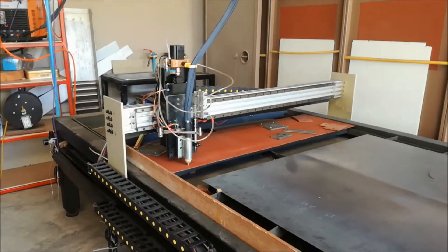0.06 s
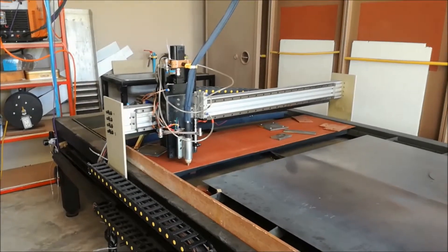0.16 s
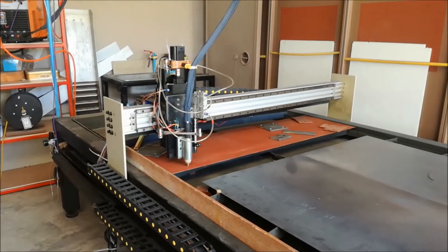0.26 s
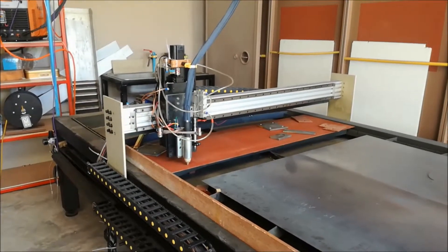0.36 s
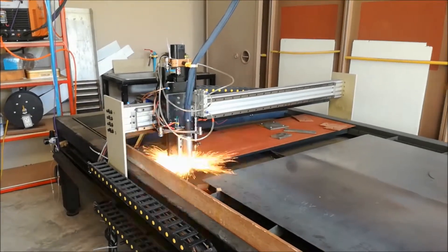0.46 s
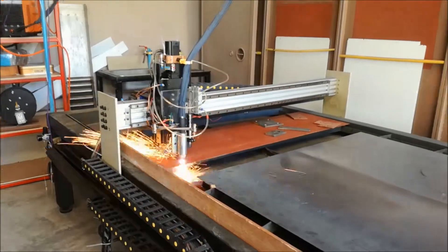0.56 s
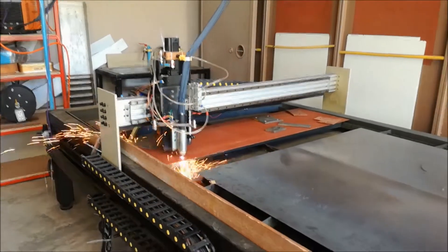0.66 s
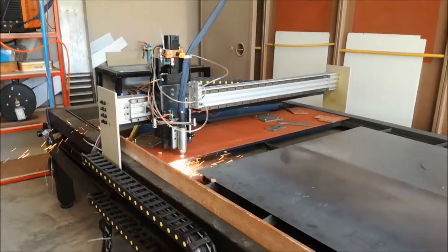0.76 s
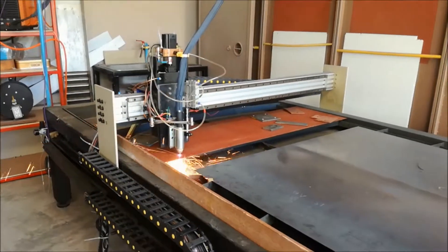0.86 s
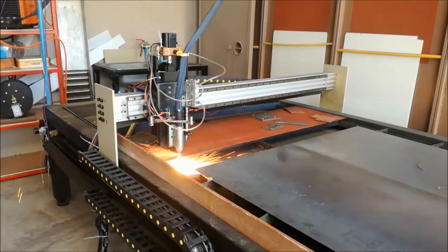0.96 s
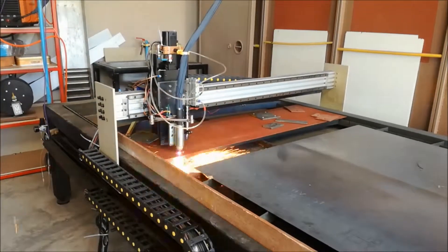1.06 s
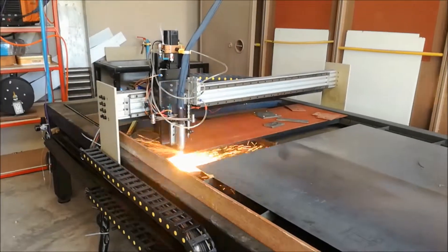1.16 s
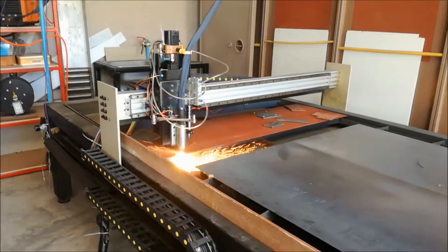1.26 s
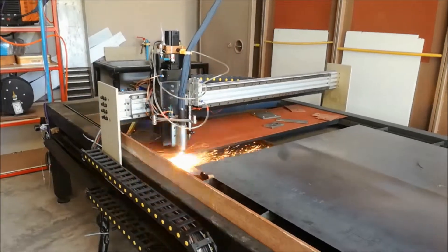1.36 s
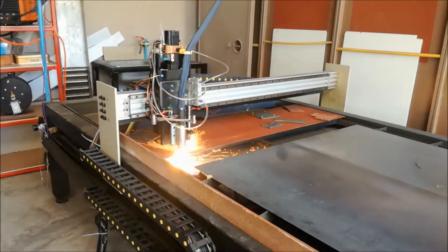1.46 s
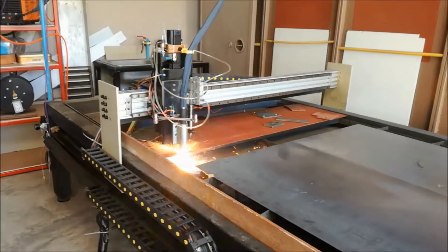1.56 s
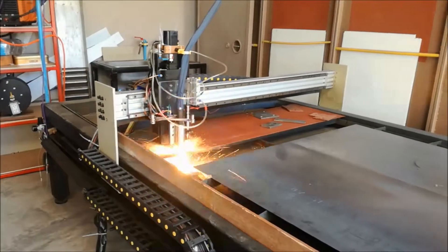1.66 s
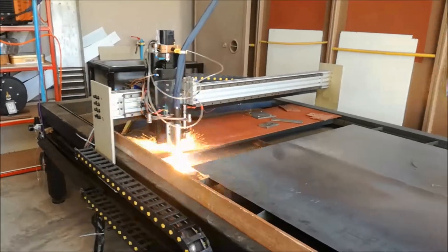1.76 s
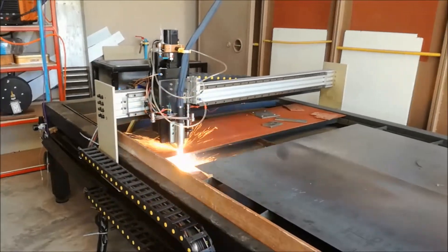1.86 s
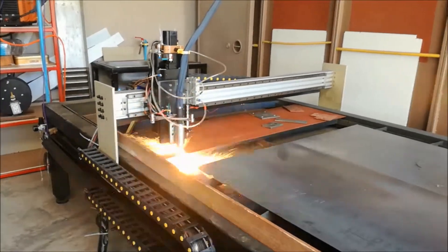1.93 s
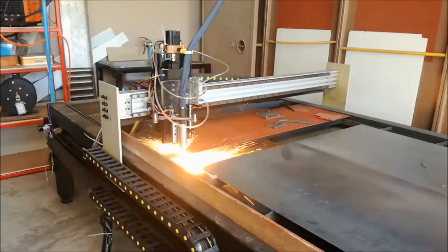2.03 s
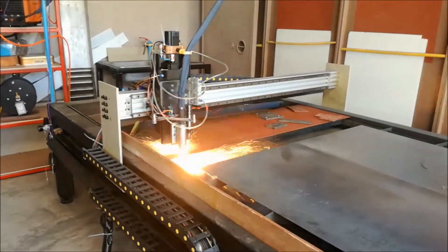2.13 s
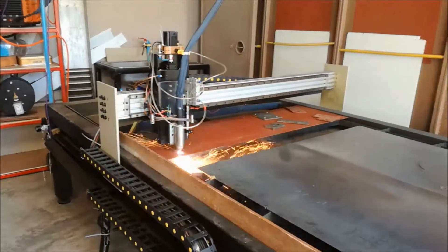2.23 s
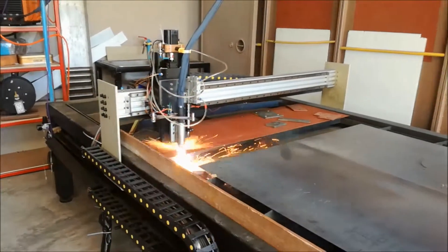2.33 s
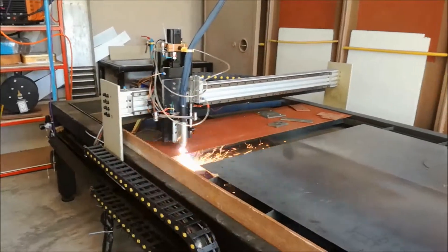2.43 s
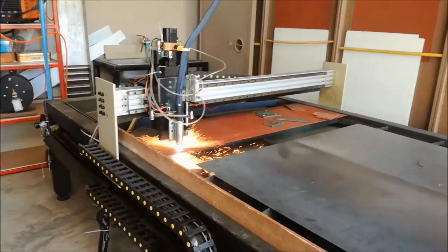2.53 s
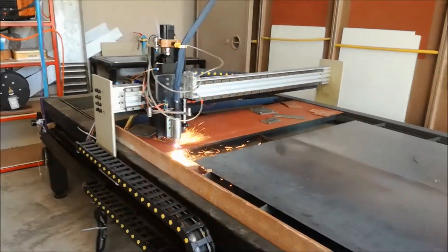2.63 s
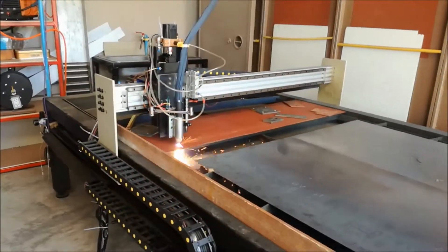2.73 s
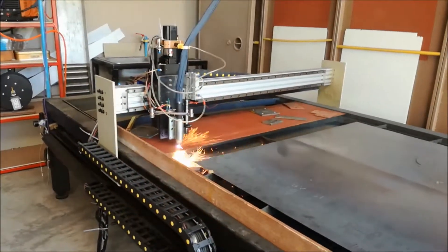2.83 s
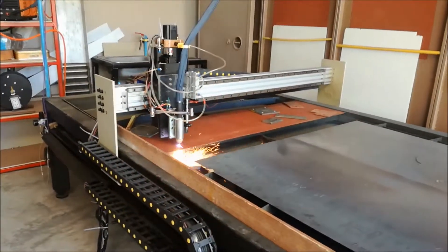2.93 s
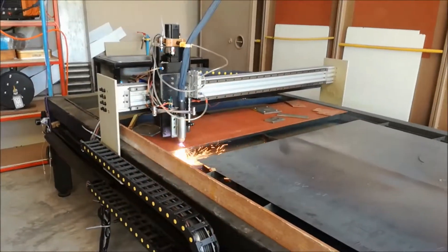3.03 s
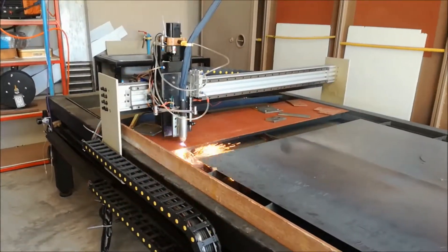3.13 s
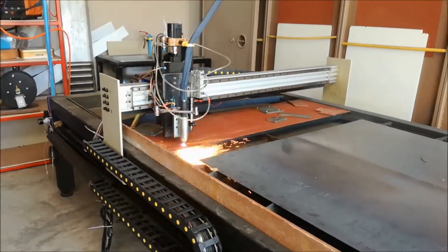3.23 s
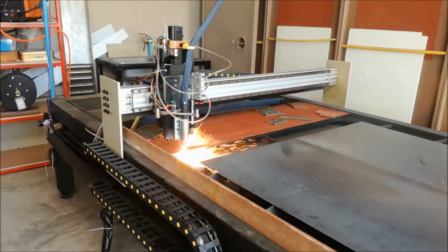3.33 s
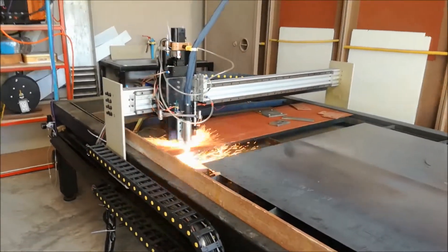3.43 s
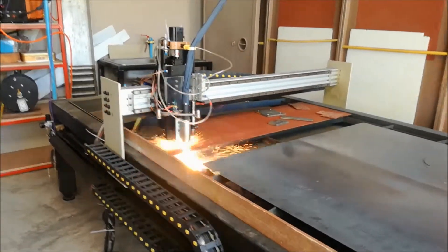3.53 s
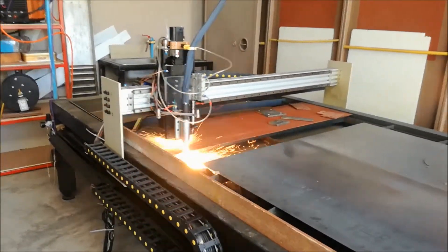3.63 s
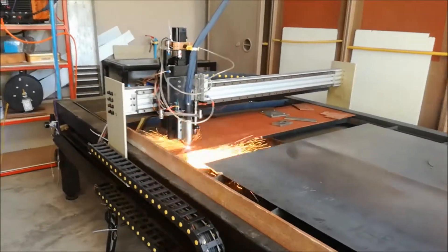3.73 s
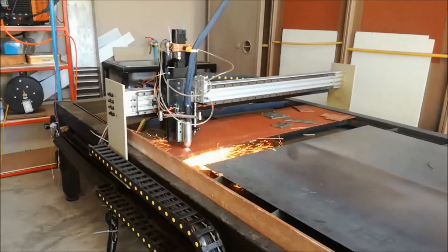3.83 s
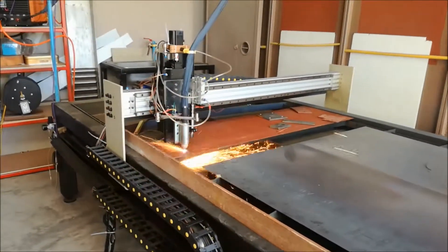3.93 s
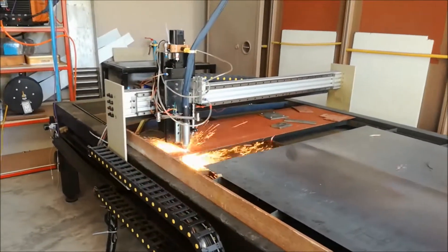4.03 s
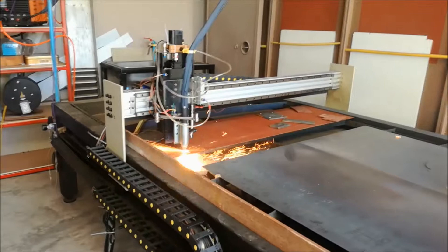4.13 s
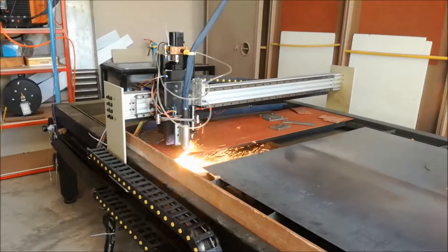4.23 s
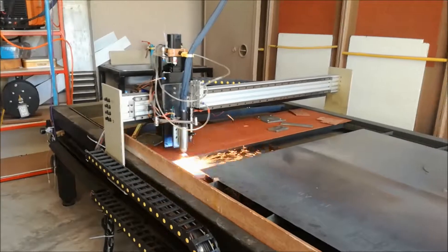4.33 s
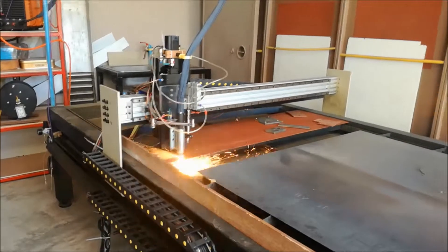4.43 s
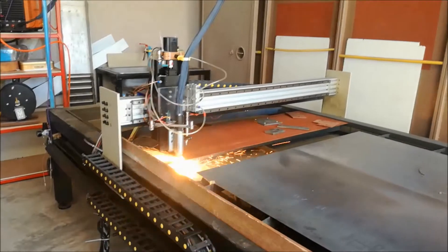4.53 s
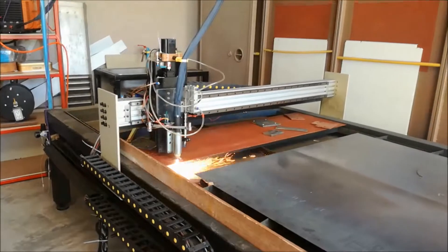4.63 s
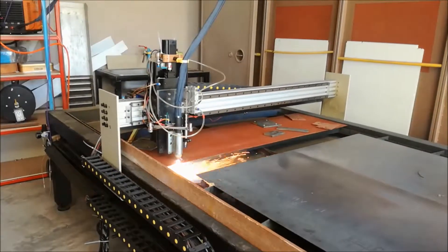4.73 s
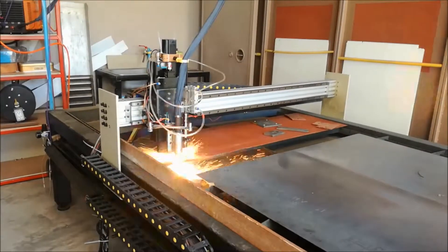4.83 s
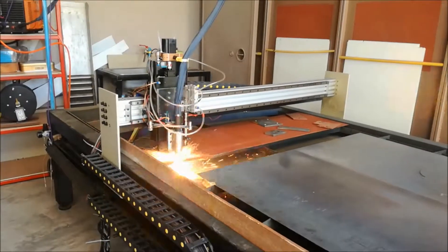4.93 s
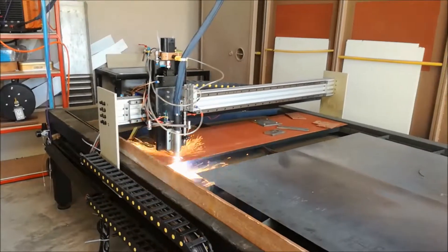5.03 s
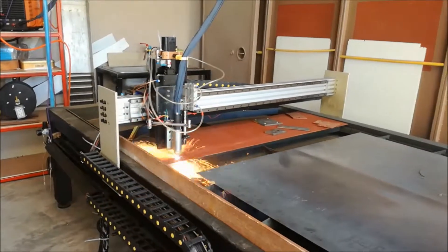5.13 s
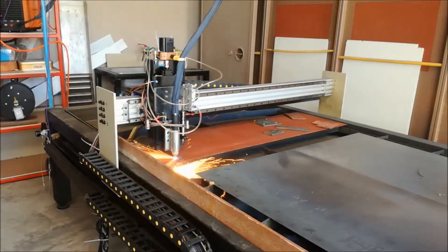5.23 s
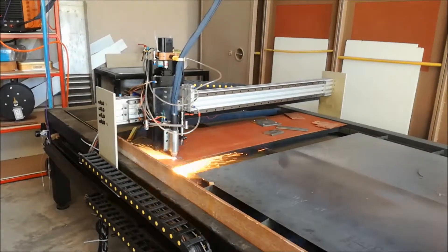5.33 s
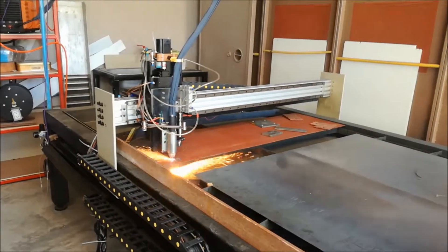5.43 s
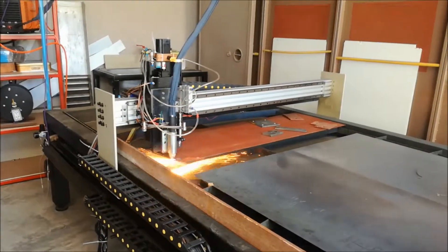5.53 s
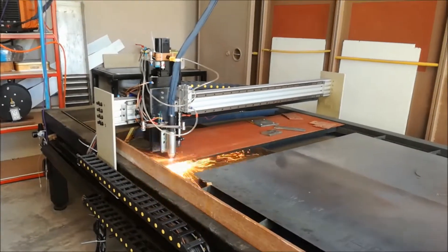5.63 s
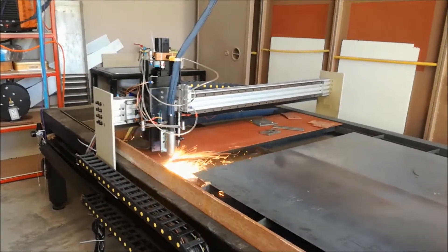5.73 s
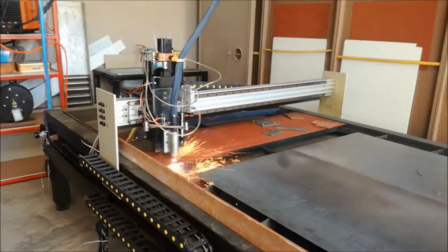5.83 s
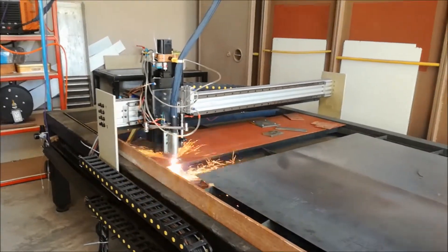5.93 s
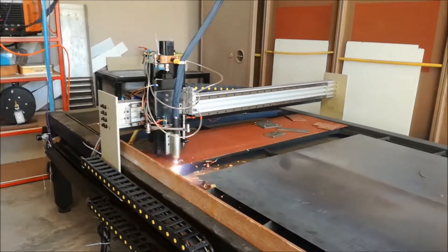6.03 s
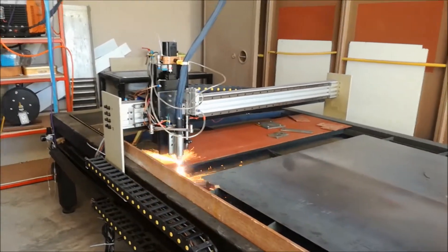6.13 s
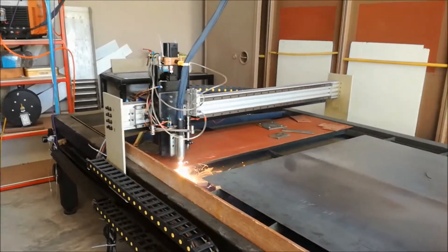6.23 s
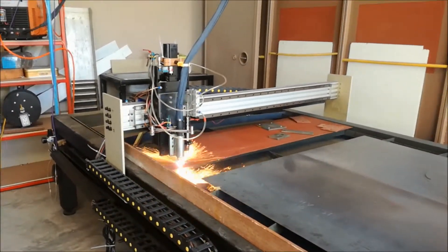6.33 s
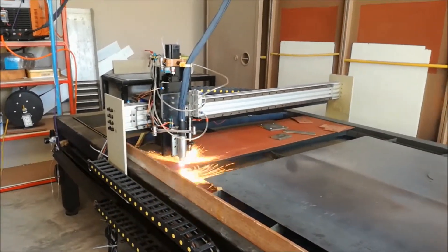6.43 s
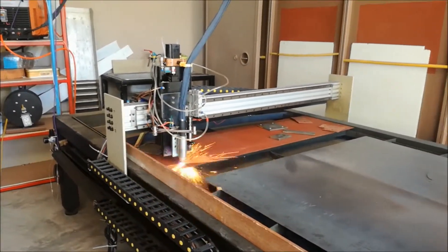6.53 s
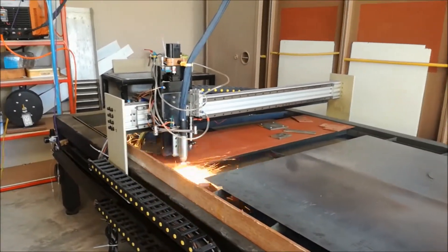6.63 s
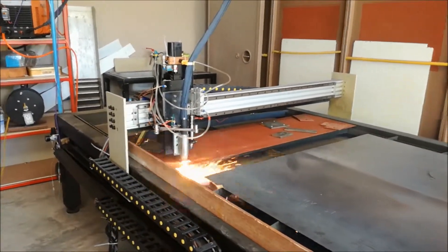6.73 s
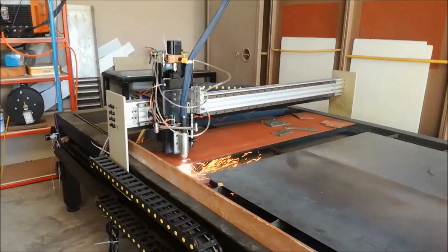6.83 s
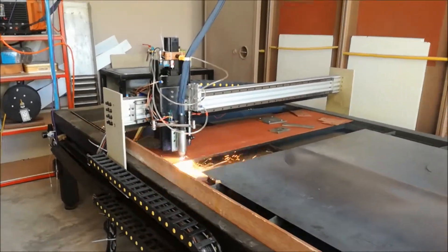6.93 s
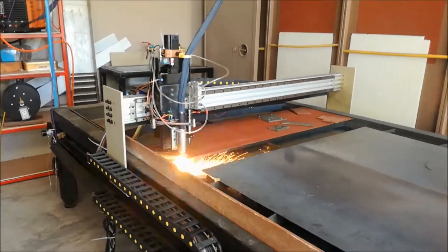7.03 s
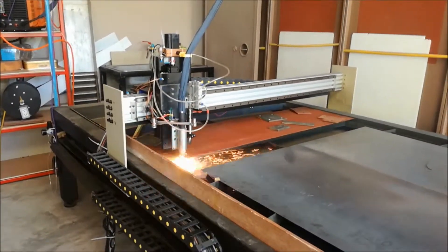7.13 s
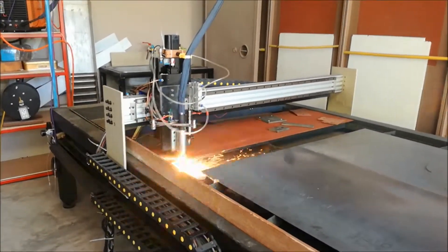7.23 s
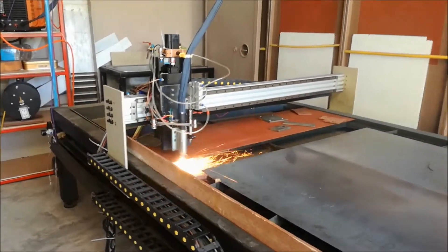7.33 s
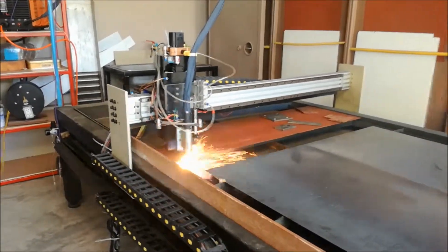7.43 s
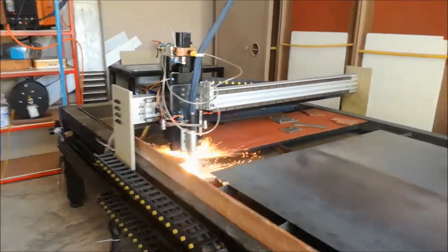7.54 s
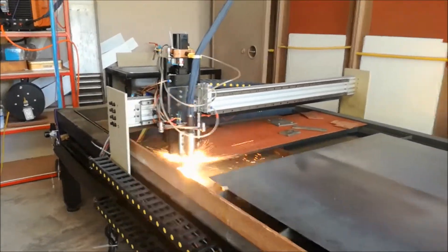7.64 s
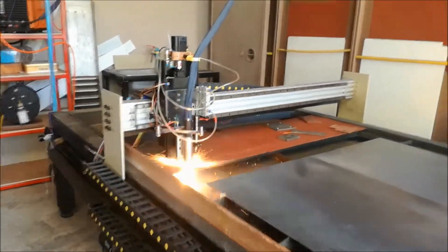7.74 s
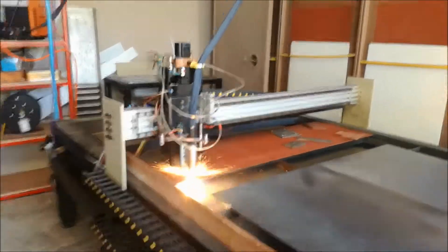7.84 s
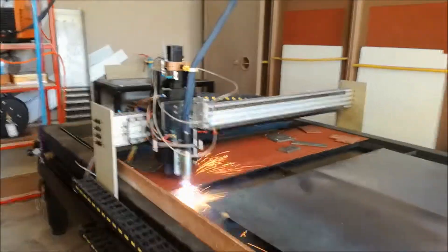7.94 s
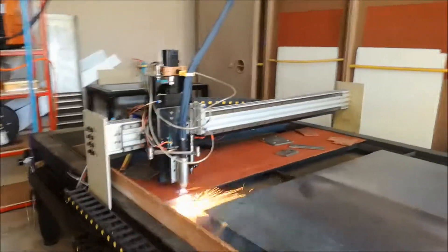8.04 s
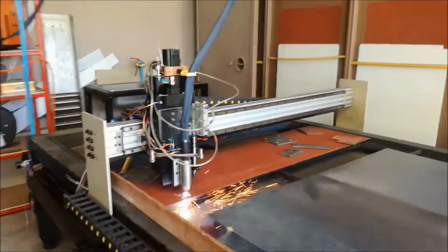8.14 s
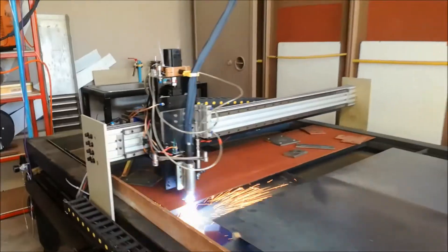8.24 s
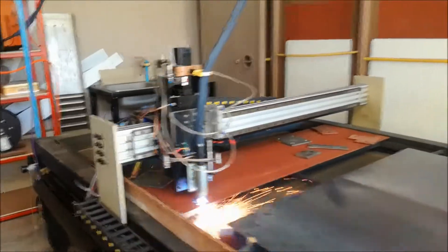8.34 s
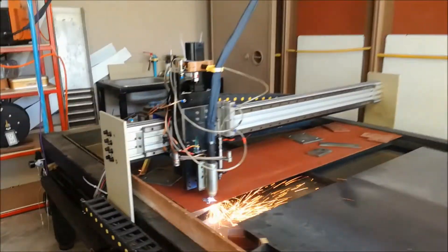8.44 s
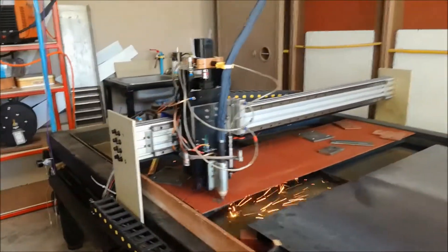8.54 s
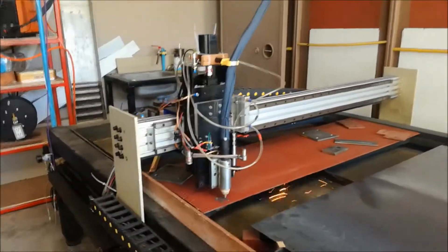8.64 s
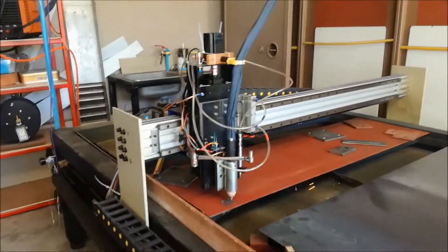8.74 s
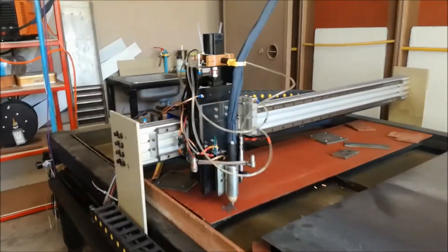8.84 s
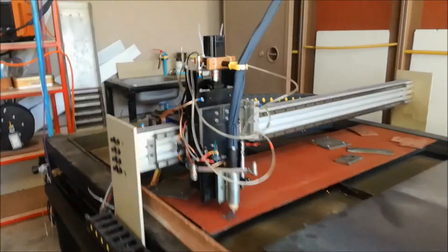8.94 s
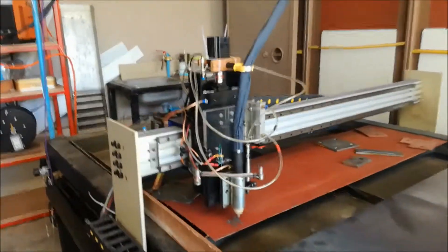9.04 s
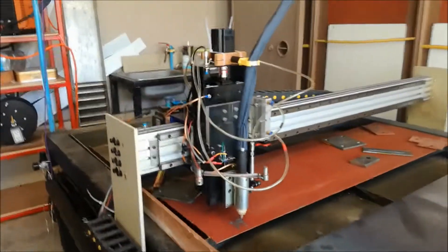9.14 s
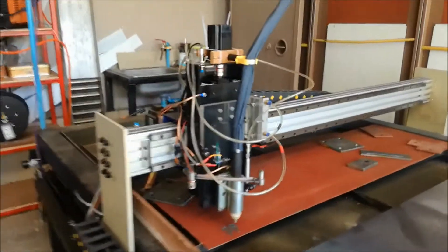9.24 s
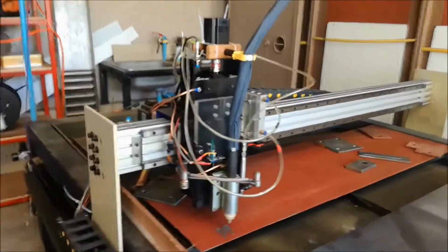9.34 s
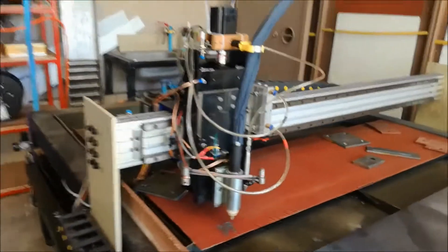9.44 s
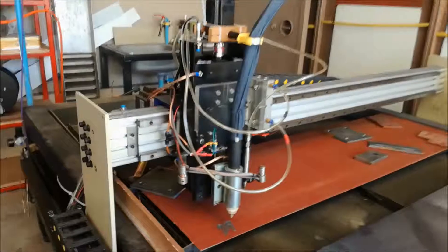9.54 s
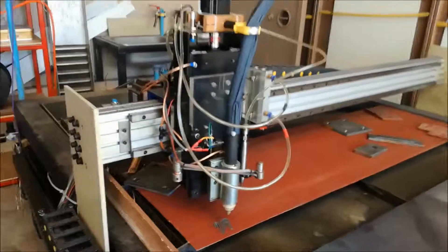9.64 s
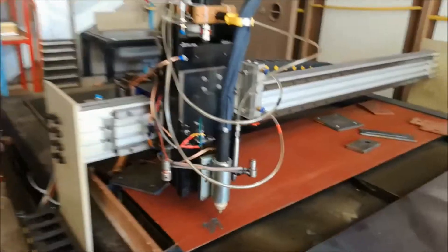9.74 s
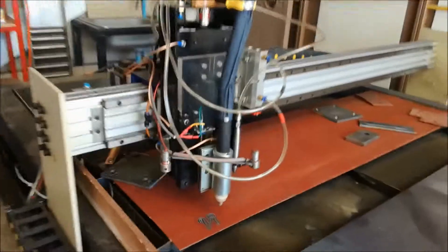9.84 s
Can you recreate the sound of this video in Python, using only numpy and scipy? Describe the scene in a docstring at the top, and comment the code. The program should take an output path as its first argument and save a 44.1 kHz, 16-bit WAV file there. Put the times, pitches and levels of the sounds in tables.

```python
"""A workshop with a plasma torch on a cutting table: the air valve opens, the arc strikes and cuts steel plate,
then goes out while the air keeps flowing.
The jet hisses and crackles with sparks, roars in the kerf and churns in the tray below: patchy, coloured noise.
Now and then a brief note, a wavering sine, whistles through. A motor hums as the torch comes down.
The hand-held camera rumbles, bursts of low noise, as it is carried closer."""
import sys
import numpy as np
from scipy import signal
from scipy.fft import rfft, irfft, next_fast_len
from scipy.io import wavfile
from scipy.ndimage import uniform_filter1d, map_coordinates

SR = 44100
rng = np.random.default_rng(int(sys.argv[2]) if len(sys.argv) > 2 else 0)


def pcm_store(signal):
    """Save signal as 16-bit PCM."""
    levels = np.round(np.clip(np.atleast_2d(signal), -1, 1) * 32767)
    wavfile.write(sys.argv[1], SR, levels.astype(np.int16).T)


N = 435708
T = np.arange(N) / SR
STRIKE_S, BREAK_S = 0.393, 8.414  # the arc lights; it runs off the plate's edge


def amp(db):
    """Decibels to gain."""
    return 10 ** (np.asarray(db) / 20)


def unit(x):
    """x at rms 1."""
    return x / np.sqrt(np.mean(x ** 2) + 1e-20)


def along(points, hz):
    """(f/Hz, value) points read on a log frequency axis."""
    f, value = np.transpose(points)
    return np.interp(np.log(hz + 1), np.log(f + 1), value)


def curves(rows):
    """One value per sample for each column after the time."""
    s, *columns = np.transpose(rows)
    return [np.interp(T, s, column) for column in columns]


def gate(start, end, rise, fall):
    """1 between start and end, with straight flanks inside them."""
    return np.clip((T - start) / rise, 0, 1) * np.clip((end - T) / fall, 0, 1)


def bell(s, length):
    """A smooth swell of height 1 at time s, down to 1/e at length seconds either side."""
    return np.exp(-((T - s) / length) ** 2)


def wobble(rate):
    """A smooth random curve, rate knots a second."""
    coarse = T[::32]
    knots = rng.standard_normal(int(N * rate / SR) + 4)
    return np.interp(T, coarse, map_coordinates(knots, [coarse * rate], order=2))


def noise_pair():
    """Two unrelated white noises."""
    return rng.standard_normal((2, N))


def filtered(x, response):
    """x times a response of frequency."""
    m = next_fast_len(N + 8192)
    gain = response(np.fft.rfftfreq(m, 1 / SR).astype(np.float32))
    spectrum = rfft(x.astype(np.float32), m) * gain.astype(np.complex64)
    return irfft(spectrum, m)[..., :N]


def colour(points):
    """The response of a (f/Hz, level/dB) spectrum."""
    return lambda hz: amp(along(points, hz))


def resonances(modes):
    """The response of (f/Hz, width/Hz, level/dB) resonances, summed with alternating signs."""
    def response(f):
        return sum((-1) ** k * amp(db) * 1j * f * width / (centre * centre - f * f + 1j * f * width)
                   for k, (centre, width, db) in enumerate(modes))
    return response


def stereo(pair, response):
    """A pair of signals, coloured as middle and side, becomes left and right whose middle has rms 1."""
    # how alike left and right are if the pair is unrelated: f/Hz, correlation
    likeness = [(60, 0.71), (120, 0.9), (240, 0.93), (480, -0.073), (950, 0.52), (1890, 0.057),
                (3770, 0.099), (7520, 0.06), (15000, -0.092)]

    def spread(hz):
        alike = np.clip(along(likeness, hz), -1, 1)
        return response(hz) * np.sqrt([1 + alike, 1 - alike])
    mid, side = filtered(pair, spread)
    return np.array([mid + side, mid - side]) / np.std(mid)


def patches(bins, frames):
    """Turns random values into patches, bins high and frames long."""
    return lambda grid: unit(uniform_filter1d(uniform_filter1d(grid, size=bins, axis=0), size=frames, axis=1))


def turbulence(patchy_db):
    """Two noises with patches of random gain: narrow ones, and broad ones that shift the timbre."""
    z = signal.stft(noise_pair(), nperseg=512)[2]
    narrow = patches(3, 14)(rng.standard_normal(z.shape[1:]))
    broad = patches(14, 30)(rng.standard_normal(z.shape[1:]))
    patchy = z * amp(patchy_db * (narrow + 0.6 * broad))
    return unit(signal.istft(patchy, nperseg=512)[1][:, :N])


def pops(rate, spread_db):
    """Random impulses of uneven size, rate a second, at rms 1."""
    size = amp(spread_db * np.minimum(rng.exponential(size=N), 3))
    return unit((rng.random(N) < rate / SR) * size * rng.choice([-1, 1], N))


def spits(rate, decay):
    """Surges that start quickly and die away with time constant decay, around zero at rms 1."""
    starts = (rng.random(N) < rate / SR) * (1 + rng.random(N))
    decaying = signal.lfilter([1], [1, -np.exp(-1 / (decay * SR))], starts)
    surge = uniform_filter1d(decaying, size=60)
    return unit(surge - surge.mean())


def workshop(x, wet_db):
    """Plate and walls comb each signal of a pair differently; the comb drifts as torch and camera move."""
    # reverberation of plate and walls: f/Hz, time to fall 60 dB/s
    walls = [(200, 0.21), (2000, 0.15), (8000, 0.069), (16000, 0.21)]
    hop = SR * 2 // 3
    echo = np.zeros((2, N + 3 * SR))
    padded = np.pad(x, ((0, 0), (hop, 2 * hop)))
    fade = np.sin(np.pi * np.arange(2 * hop) / (2 * hop))
    for start in range(0, N + hop, hop):  # each overlapping stretch gets a fresh tail
        hz, t, z = signal.stft(rng.standard_normal((2, SR // 6)), SR, nperseg=256)
        decay = amp(-60 * t / along(walls, hz)[:, None])
        tail = signal.istft(z * decay, SR, nperseg=256)[1]
        tail = tail / np.linalg.norm(tail[0])
        part = signal.fftconvolve(padded[:, start:start + 2 * hop] * fade, tail, axes=1)
        echo[:, start:start + part.shape[1]] += part
    return unit(x + amp(wet_db) * echo[:, hop:hop + N])


def lift_motor():
    """The lift motor hums waveringly, with a rough resonant whine, until the cut is under way."""
    # moves of the motor, each a swell of hum: t/s, level/dB, half-length/s
    lifts = [(0.08, -46, .02), (.24, -52, 0.061), (0.362, -41.5, 0.028), (.48, -48, .06)]
    # resonances of its rough whine: f/Hz, width/Hz, level/dB
    motor = [(154, 26, 1), (208, 34, -4), (352, 25, -11), (830, 55, -20), (1190, 40, -11), (1300, 41, -13),
             (1470, 60, -17)]
    swells = sum(amp(db) * bell(s, length) for s, db, length in lifts)
    pitch_hz = 183 * (1 + 0.026 * wobble(35.5))
    hum = swells * np.sqrt(2) * np.sin(2 * np.pi * np.cumsum(pitch_hz) / SR)
    whine = amp(-53.0) * stereo(noise_pair(), resonances(motor))
    return (hum + whine) * gate(-1, 0.59, .1, .1)


def shop_air():
    """Workshop air is steady coloured noise over a slowly heaving rumble."""
    # colour of the room: f/Hz, density/dB
    shop = [(25, -25), (60, -21), (110, -9), (170, -1), (280, -5), (400, -5.5), (600, -11), (900, -3),
            (1300, -14), (2000, -12.5), (5000, -21.5), (12000, -46), (16000, -60)]
    low = [(20, -5), (45, 4), (100, 4), (250, -24), (1000, -80)]  # f/Hz, density/dB
    room = amp(-59.0) * stereo(noise_pair(), colour(shop))
    rumble = amp(-72.5 + 5.0 * wobble(8)) * stereo(noise_pair(), colour(low))
    return room + rumble


def thumps():
    """The hand on the camera and the dying jet make soft bumps, each a short band of low noise."""
    # the bumps: t/s, level/dB, f/Hz, half-length/s
    bumps = [(.15, -64, 55, .12), (.45, -55, 60, .06), (8.438, -42.5, 115, 0.023), (8.64, -51, 75.4, 0.045),
             (8.77, -45, 55, 0.028), (8.875, -46.5, 80, 0.035), (9.018, -54, 65, .06), (9.12, -59, 40, .04),
             (9.496, -49, 60, 0.024), (9.62, -57, 55, 0.1), (9.758, -58, 35, .06)]
    out, shake = np.zeros(N), rng.standard_normal(N)
    for s, db, hz, length in bumps:
        band = signal.butter(2, [hz / 1.5, hz * 1.7], "bandpass", fs=SR, output="sos")
        out += amp(db) * bell(s, length) * unit(signal.sosfilt(band, shake))
    return out


def air():
    """Compressed air hisses from the bare nozzle: a tick and leak at the valve, a spurt, then the cooling flow."""
    # nearness of the camera to the nozzle: t/s, gain/dB
    near = [(8.52, -2), (8.7, .5), (9.02, 1), (9.25, 3), (9.68, 5), (9.88, -.5)]
    # cooling flow, rows hiss, sizzle, low rush, nozzle ring: level/dB, share of the nearness
    cooling_layers = [(-38.5, 1.16), (-38.5, 0.5), (-52, 0.86), (-45, 2.5)]
    # colours of the hiss, the sizzle and the low rush: f/Hz, density/dB
    air_hiss = [(1100, -48), (1700, -9), (2300, -6), (3000, -4), (3500, -1), (4200, -6), (5500, -2.5),
                (6600, -4), (7800, -3.5), (10000, -16), (13000, -34), (17000, -60)]
    air_sizzle = [(4700, -28), (8000, -4), (9500, -5), (11000, -3), (12500, -4.5), (14500, -1),
                  (15700, -2.5)]
    air_low = [(380, -61), (650, -34), (820, -10.5), (1340, 2), (1460, 2.5), (1870, -4), (2000, -8),
               (2300, -14), (2990, -44), (5060, -120)]
    # the nozzle's sharp ring: f/Hz, width/Hz, level/dB
    nozzle_modes = [(4560, 1030, 1), (5700, 360, 2), (7900, 700, -10)]
    valve_s, spurt_fade_db_per_s = .319, 113

    tick = amp(-14) * gate(.295, .304, .001, .008)
    leak = amp(-22) * gate(.295, .325, .002, .015)
    valve = tick + leak
    spurt = gate(valve_s, .42, 0.0055, 0.025)
    spurt_fade_db = spurt_fade_db_per_s * np.maximum(T - valve_s, 0)  # the hose pressure drops

    near_db, = curves(near)
    cooling = np.clip((T - BREAK_S) / 0.065, 0, 1)
    hiss, sizzle, low, ring = [amp(db + share * near_db) * cooling for db, share in cooling_layers]
    hiss = hiss + amp(-37) * valve + spurt * amp(-29.5 - spurt_fade_db)
    sizzle = sizzle + amp(-34) * valve + spurt * amp(-42)
    low = low + spurt * amp(-36)
    return (hiss * stereo(workshop(turbulence(patchy_db=1.0), wet_db=-3.5), colour(air_hiss))
            + sizzle * stereo(turbulence(patchy_db=1.8), colour(air_sizzle))
            + low * stereo(turbulence(patchy_db=1.0), colour(air_low))
            + ring * stereo(noise_pair(), resonances(nozzle_modes)))


def surges():
    """As the jet digs into the tray, churn and drone gain decibels: each surge rises, holds and falls."""
    # surges (a gain below 0 adds nothing): start t/s, end t/s, churn gain/dB, drone gain/dB
    digs = [(.3, 0.692, 12.5, 9), (0.86, 1.19, 8.5, 8), (1.24, 1.86, 12, 9.5), (1.87, 2.445, 13.5, 10),
            (2.41, 2.805, 10.5, 7), (3.354, 3.735, 13, 11), (3.782, 3.97, 9, 3), (4.05, 4.364, 2, 8),
            (4.358, 4.53, 8, 10), (4.73, 5.11, 8.5, 10.5), (5.24, 5.603, 18, 12), (5.706, 6.026, 8, 10),
            (6.046, 6.34, 11, 0), (6.33, 6.548, 16.5, 8), (6.76, 7.15, -1, 7), (7.23, 7.946, 5, 8),
            (8.11, 8.386, 9, 5)]
    out = np.zeros((2, N))
    for start, end, *gains in digs:
        out = np.maximum(out, np.outer(gains, gate(start, end, rise=0.032, fall=0.056)))
    return out


def lulls():
    """Decibels that the rush under the plate loses as it drops away."""
    # lulls: start t/s, end t/s, depth/dB
    drops = [(2.77, 3.29, 5), (3.7, 3.83, 12), (3.934, 4.21, 18), (4.585, 4.76, 8), (5.58, 5.72, 2),
             (6.574, 7.236, 1.5)]
    return sum(db * gate(start, end, 0.069, 0.069) for start, end, db in drops)


def tray(churn_db, drone_db, lull_db):
    """Under the plate the jet drones, churns in lumps and rushes through the hollow table."""
    # deep resonances, then shallow ones: f/Hz, width/Hz, level/dB
    deep_modes = [(101.7, 5.1, -7), (155.2, 10.2, 1.5), (184.7, 15, 0), (200, 21, -1)]
    shallow_modes = [(256.5, 9, 1.5), (317, 15, -2), (353, 22.5, -1), (392, 39, -6.5)]
    # colour of the hollow rush: f/Hz, density/dB
    hollow = [(250, -34), (340, -4.5), (400, -7), (450, -1), (560, 2), (680, 0.5), (780, 3), (930, -8.5),
              (1240, -44), (2000, -80)]
    deep_tilt = [(50, -18), (100, 0.5), (220, 4.5), (330, -18)]  # f/Hz, gain/dB
    shallow_tilt = [(120, -28), (235, 0.0), (400, -3.0), (560, -9)]  # f/Hz, gain/dB

    def deep(hz):
        return resonances(deep_modes)(hz) * colour(deep_tilt)(hz)

    def shallow(hz):
        return resonances(shallow_modes)(hz) * colour(shallow_tilt)(hz)

    snap_db = 10 * gate(BREAK_S, BREAK_S + .07, .004, 0.046)  # the tray's gulp as the jet breaks free
    hollow_db = -52.5 + 0.28 * (churn_db + snap_db) - lull_db + 2 * wobble(14)
    lumps = amp(3.1 * wobble(20)) * noise_pair()
    drone = amp(-61 + drone_db + snap_db) * stereo(lumps, deep)
    churn = amp(-62.5 + churn_db + snap_db) * stereo(lumps, shallow)
    rush = amp(hollow_db) * stereo(turbulence(patchy_db=1.74), colour(hollow))
    return (drone + churn + rush) * gate(0.314, 8.55, 0.022, 0.055)


def flickers():
    """Decibels by which the cut falters or flares up for a moment."""
    # moments: t/s, gain/dB, width between the 1/e points/s
    moments = [(1.206, -5, 0.15), (1.658, -2.5, 0.14), (2.213, 2.5, 0.1), (2.42, 3, 0.096), (2.803, 2, .08),
               (3.743, -5, 0.12), (3.99, -5, 0.17), (4.443, -5, 0.15), (4.73, 1.5, 0.066),
               (4.87, -3.5, 0.14), (5.13, -3.5, 0.066), (5.617, -5.5, 0.11), (6.313, -2.6, 0.051),
               (6.562, -4.5, 0.12), (6.826, 2, 0.16), (7.026, -6, .15), (7.712, -5.6, 0.33)]
    return sum(db * bell(s, length / 2) for s, db, length in moments)


def cutting_jet(jet_db, fine_db, flicker_db, spit_db):
    """The plasma jet hisses and sizzles as turbulence; bursting drops of steel crackle in it."""
    # colours of the hiss and the sizzle: f/Hz, density/dB
    hiss_colour = [(1100, -44), (1700, -14), (1900, -11.5), (2200, -6), (2700, -3), (3450, 0.4),
                   (4300, -0.5), (5600, 0), (6500, -1.1), (8000, -5.5), (10000, -12.5), (13000, -15),
                   (17000, -60)]
    sizzle_colour = [(4400, -37), (7500, 0), (9500, -1), (12000, -2.5), (14500, 0), (15700, -0.5)]
    hiss_db = jet_db + flicker_db + 0.76 * wobble(11)
    sizzle_db = fine_db + 1.3 * flicker_db + 1.6 * wobble(11)
    sparks = pops(rate=390, spread_db=-1.5)
    # two samples later in the side signal, the crackle spreads across the stereo
    sparks = np.array([sparks, np.roll(sparks, 2)])
    coarse_jet = workshop(turbulence(patchy_db=1.0) + amp(-9.5) * sparks, wet_db=-4.0)
    fine_jet = workshop(turbulence(patchy_db=1.0) + amp(-18) * sparks, wet_db=-2.5)
    hiss = amp(hiss_db + spit_db) * stereo(coarse_jet, colour(hiss_colour))
    sizzle = amp(sizzle_db + spit_db) * stereo(fine_jet, colour(sizzle_colour))
    return hiss + sizzle


def kerf_roar(jet_db, flicker_db, spit_db, surge_db, lull_db):
    """The jet roars in the kerf and sets the table ringing, less as the torch moves along."""
    # colour of the roar: f/Hz, density/dB
    roar_colour = [(600, -41), (850, -10.5), (930, -3.5), (1150, 0.5), (1400, -1.5), (1720, 0.5),
                   (1900, -1.5), (2300, -5.5), (3000, -3.5), (5000, -58)]
    # ringing of the table: f/Hz, width/Hz, level/dB
    table_modes = [(676, 13, -1.5), (901, 24, -3), (985, 22, -2), (1195, 32, -1), (1396, 44, 3.5),
                   (1550, 29, 0.5), (1692, 35, -1), (2000, 40, 0)]
    usual_cut_db = -29  # hiss level of a usual cut
    pierce_db = 2.5 * bell(.55, 0.019)  # the jet breaks through the plate
    roar_db = -39 + 0.27 * (jet_db - usual_cut_db) + 0.45 * flicker_db + 0.12 * surge_db
    roar_db = roar_db - 0.17 * lull_db + pierce_db + 0.62 * wobble(16)
    ring_db = -3 - 0.58 * (T - STRIKE_S) - 0.26 * lull_db  # relative to the roar
    roar = amp(roar_db + spit_db) * stereo(workshop(turbulence(patchy_db=1.5), wet_db=2.5), colour(roar_colour))
    ringing = stereo(noise_pair(), lambda hz: resonances(table_modes)(hz) * (hz > 600))
    return roar + amp(roar_db + ring_db) * ringing


def arc(surge_db, lull_db):
    """The arc strikes at once, spits as it blows melt out of the cut, and dies at the plate's edge."""
    # strength of the jet as the torch travels: t/s, hiss level/dB, sizzle level/dB
    strength = [(.4, -33, -32.5), (.5, -24.5, -26), (.7, -26, -29.5), (1.0, -26.8, -27.5),
                (1.35, -29.5, -30), (1.9, -29, -31.5), (2.3, -27, -31), (2.85, -27.5, -29.5),
                (3.5, -29.5, -31.5), (4.2, -30.5, -32), (5.45, -32, -32.5), (5.9, -28.5, -30.5),
                (6.4, -29.5, -34), (7.4, -31.5, -31.5), (8.0, -28, -28.5), (8.35, -27, -30.5)]
    jet_db, fine_db = curves(strength)
    flicker_db = flickers()
    spit_db = .52 * spits(rate=92, decay=0.022)
    sound = cutting_jet(jet_db, fine_db, flicker_db, spit_db)
    sound = sound + kerf_roar(jet_db, flicker_db, spit_db, surge_db, lull_db)
    strike = np.clip((T - STRIKE_S) / 0.013, 0, 1)
    dying = amp(-150 * np.maximum(T - BREAK_S, 0))  # dB per second
    return sound * strike * dying


def whistles():
    """For moments a slightly unsteady sine sings through the cut, from the plate's edge or the gantry drive."""
    # the notes: start t/s, end t/s, f/Hz, level/dB
    notes = [(4.383, 4.54, 775, -47), (4.805, 4.93, 1085, -48), (5.257, 5.4, 1130, -43.5),
             (7.584, 7.87, 776, -45.5)]
    out, waver, swell = np.zeros(N), wobble(70), amp(1.8 * wobble(30))
    for start, end, hz, db in notes:
        phase = 2 * np.pi * np.cumsum(hz * (1 + 0.0057 * waver)) / SR
        out += amp(db) * swell * gate(start, end, 0.038, 0.041) * np.sqrt(2) * np.sin(phase)
    return out


def pop():
    """The arc lets go of the steel with a dull pop, a fast-fading burst of noise."""
    # colour of the pop: f/Hz, density/dB
    pop_colour = [(60, -15), (180, 3), (400, -2), (1100, -4), (2500, -20), (8000, -50)]
    pop_s, fade_db_per_s = 8.417, 1309
    attack = np.clip((T - pop_s) / 0.0012, 0, 1)
    envelope = attack * amp(-37 - fade_db_per_s * np.maximum(T - pop_s, 0))
    return envelope * stereo(noise_pair(), colour(pop_colour))


def scene():
    """Everything at the two microphones, whose balance varies with frequency."""
    # balance of the microphones: f/Hz, left minus right/dB
    lean = [(60, 6), (92, -5.5), (140, 0.5), (210, 1), (330, 0.0), (500, 1), (770, 0.5), (1170, 0),
            (1790, -1.0), (2740, -2.5), (4190, -2.5), (6410, -1), (9810, 7.5), (15000, 4)]
    (churn_db, drone_db), lull_db = surges(), lulls()
    sound = lift_motor() + shop_air() + thumps() + air()
    sound = sound + tray(churn_db, drone_db, lull_db) + arc(churn_db, lull_db)
    sound = sound + whistles() + pop()
    return filtered(sound, lambda hz: amp(np.array([[.5], [-.5]]) * along(lean, hz)))


def record(dry):
    """The camera rolls off steeply over the last 200 Hz below its band limit."""
    top_hz = 15850
    return filtered(dry, lambda hz: np.sin(np.pi / 2 * np.clip((top_hz - hz) / 200, 0, 1)) ** 2)


dry = scene()
out = record(dry)
pcm_store(out)
```